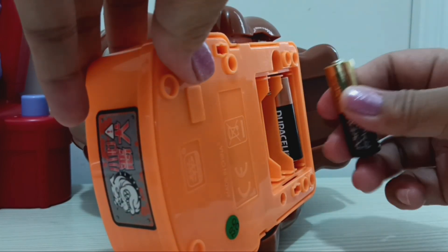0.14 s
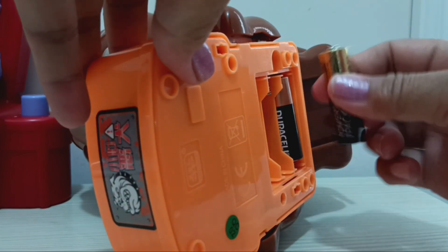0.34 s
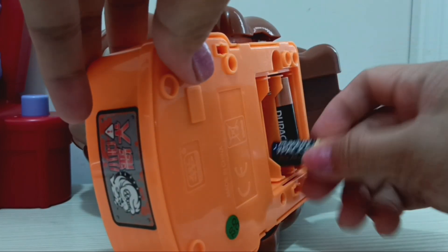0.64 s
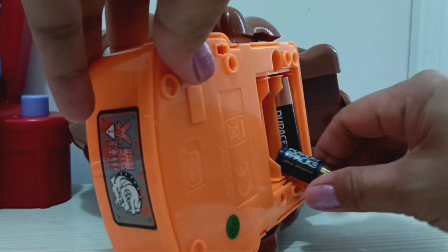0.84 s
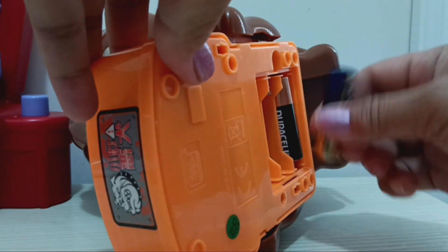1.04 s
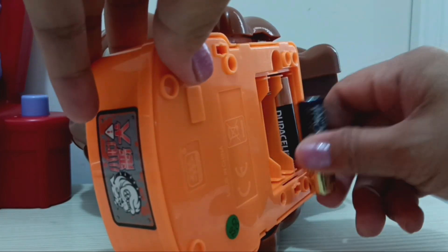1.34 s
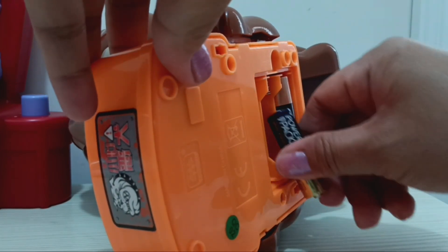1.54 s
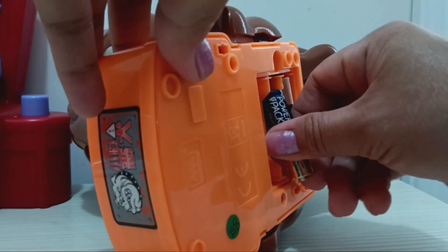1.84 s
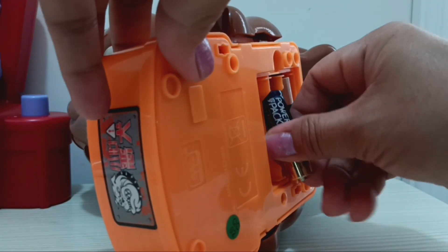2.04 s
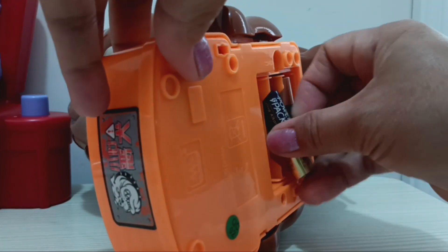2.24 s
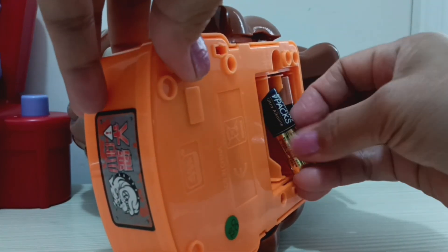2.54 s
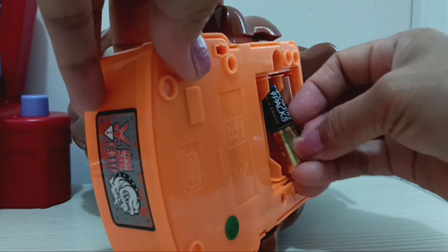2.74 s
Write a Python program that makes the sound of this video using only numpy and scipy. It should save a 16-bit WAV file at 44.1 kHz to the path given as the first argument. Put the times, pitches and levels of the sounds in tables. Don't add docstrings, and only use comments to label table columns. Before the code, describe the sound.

A small battery clicks and knocks into a hollow plastic toy, snapping home at two seconds

```python
import sys
import numpy as np
from scipy import signal
from scipy.fft import rfft, irfft, next_fast_len
from scipy.io import wavfile

SR = 44100
rng = np.random.default_rng(int(sys.argv[2]) if len(sys.argv) > 2 else 0)


def elevation(decibels):
    levels = np.asarray(decibels, float)
    return 10 ** (levels / 20)


def pcm_store(signal):
    levels = np.round(np.clip(np.atleast_2d(signal), -1, 1) * 32767)
    wavfile.write(sys.argv[1], SR, levels.astype(np.int16).T)


N = 127890
SPAN = 4096
SHELL_LIKENESS = 0.97

# (frequency [Hz], level [dB])
TOY_BALANCE = [(60, -9), (250, 12), (900, 11.5), (2100, 12), (4000, -3), (8500, -5.5), (10500, -29),
               (13000, -57)]
ROOM_BALANCE = [(60, 4.5), (250, 6), (1300, 5.5), (8000, -1), (11500, -31.5), (15000, -59)]


def rms_one(x):
    return x / np.sqrt(np.mean(x ** 2) + 1e-20)


def at_hz(points, hz):
    table_hz, value = np.transpose(points)
    return np.interp(np.log(hz), np.log(table_hz), value)


def drift(rate_hz):
    r = np.exp(-80 * np.pi * rate_hz / SR)
    slow = signal.lfilter([1], [1, -2 * r, r * r], rng.standard_normal(N // 40 + 2002))[2000:]
    return np.interp(np.arange(N) / 40, np.arange(len(slow)), rms_one(slow - slow.mean()))


def ring(push, hz, t60_s):
    r, w = elevation(-60 / (t60_s * SR)), 2 * np.pi * hz / SR
    return signal.lfilter([0, np.sin(w)], [1, -2 * r * np.cos(w), r * r], push + 1e-18)


def peak(x, hz, width_hz):
    r = np.exp(-np.pi * width_hz / SR)
    zeros = np.array([1, 0, -1]) * (1 - r * r) / 2
    poles = [1, -2 * r * np.cos(2 * np.pi * hz / SR), r * r]
    return signal.lfilter(zeros, poles, x + 1e-18)


def band(x, low_hz, high_hz):
    return signal.sosfilt(signal.butter(2, [low_hz, high_hz], "band", fs=SR, output="sos"), x)


def pair(noise, likeness):
    c = np.clip(likeness, 0, 1)
    common = np.sqrt((1 + c) / 2) * noise[0]
    opposed = np.sqrt((1 - c) / 2) * noise[1]
    return common + opposed * [[1], [-1]]


def ports(x, balance):
    left_lag_s = 0.0009827
    size = next_fast_len(N + 4096)
    hz = np.arange(size // 2 + 1) * SR / size + 1e-3
    db = at_hz(balance, hz)
    left = elevation(np.minimum(db, db / 2)) * np.exp(-2j * np.pi * hz * left_lag_s)
    right = elevation(-np.maximum(db / 2, 0))
    return irfft(rfft(x, size) * np.array([left, right]), size)[:, :N]


def room(x):
    t60_s, wall_cut_hz = 0.22, 13000
    size = next_fast_len(N + SR // 2)
    delay = np.exp(-2j * np.pi * np.arange(size // 2 + 1) / size)
    turn = np.log(delay)
    dull = np.exp(-2 * np.pi * wall_cut_hz / SR)
    echoes = np.zeros((2, size // 2 + 1), complex)
    lags = (rng.uniform(0.004, 0.03, 16) * SR).astype(int)
    for k, lag in enumerate(lags):
        decay = elevation(-60 * lag / SR / t60_s)
        loop = decay * (1 - dull) / (1 - dull * delay) * np.exp(lag * turn)
        echoes[k % 2] += (-1) ** (k // 2) * loop / (1 - loop)
    return irfft(echoes * rfft(x.mean(axis=0), size), size)[:, :N]


def hum():
    # (time [s], level [dB])
    tone_swell = [(0, -56.5), (.38, -63), (.47, -70.5), (.58, -61), (.76, -63.5), (0.901, -47.5),
                  (1.0, -67.5), (1.17, -59.5), (1.27, -49.5), (1.388, -52), (1.46, -65.5), (1.7, -56.5),
                  (1.881, -55.5), (1.97, -73), (2.15, -55.5), (2.33, -52.5), (2.421, -64.5), (2.9, -60.5)]
    # (time [s], level [dB])
    whine_swell = [(0, -12), (.9, -10), (1.05, 0), (1.38, 0), (1.5, -9), (2.7, -8), (2.85, 0)]
    tone_hz, wander_hz, flicker_db = 101.6, 0.98, 5
    drone_hz, drone_width_hz, drone_db = 269.5, 27.2, -63.5
    whine_hz, whine_width_hz, whine_db = 4460, 50, -76
    t = np.arange(N) / SR
    tone_db = np.interp(t, *np.transpose(tone_swell)) + flicker_db * drift(10.5)
    phase = 2 * np.pi * np.cumsum(tone_hz + wander_hz * drift(9.5)) / SR
    tone = np.sqrt(2) * elevation(tone_db) * np.sin(phase)
    white = rng.standard_normal((2, N))
    drone = peak(peak(white[0], drone_hz, drone_width_hz), drone_hz, drone_width_hz)
    whine = peak(peak(white[1], whine_hz, whine_width_hz), whine_hz, whine_width_hz)
    whine_db = whine_db + np.interp(t, *np.transpose(whine_swell))
    return tone + elevation(drone_db) * rms_one(drone) + elevation(whine_db) * rms_one(whine)


def air():
    # (frequency [Hz], level [dB per Hz])
    colour = [(20, -20), (70, -13.5), (250, -15.5), (600, -24.5), (2000, -39), (7000, -38.5),
              (11000, -47.5), (15500, -62)]
    # (frequency [Hz], share common to both ports [0-1])
    likeness = [(50, 0.1), (100, 1), (250, 0.54), (800, 0.06), (2000, 0.024)]
    level_db, patchy_db = -62.5, 2.5
    hiss, together = 0, drift(1.5)
    edges_hz = 18 * 2 ** np.arange(0, 10.1, 0.5)
    white = rng.standard_normal((2, 2, N))
    for k, (low, high) in enumerate(zip(edges_hz, edges_hz[1:])):
        hz = np.sqrt(low * high)
        flicker_db = patchy_db * (0.45 * together + drift(42.0))
        noise = pair(band(white[k % 2], low, high), at_hz(likeness, hz))
        hiss = hiss + elevation(at_hz(colour, hz) + flicker_db) * noise
    hiss = elevation(level_db) * rms_one(hiss)
    hiss = hiss + elevation(10) * peak(hiss, 10040, 1040)
    return 0.39 * hiss + signal.sosfilt(signal.butter(6, 8540, fs=SR, output="sos"), hiss)


def body(modes, rows, column, likeness):
    slip_spread_db, strike_spread_db = 3.0, 3.0
    t = np.arange(1, SPAN + 1) / SR
    strike_db = strike_spread_db * rng.standard_normal((len(rows), len(modes)))
    shape = (len(rows), 2, SPAN)
    slips = elevation(slip_spread_db * rng.exponential(1, shape)) * rng.standard_normal(shape)
    pushes = []
    for row, noise in zip(rows, slips):
        chatter_s = np.clip(row[-1], 0.1, 30) / 1000
        envelope = (1 - np.exp(-t / chatter_s)) * np.exp(-t / chatter_s)
        pushes.append(pair(noise, likeness) * envelope)
    starts = np.array(pushes)[:, :, :SPAN // 2]
    out = 0
    for k, (hz, mode_db, t60_s) in enumerate(modes):
        train = np.zeros((2, N + SPAN))
        heights = np.abs(ring(starts, hz, t60_s)).max(axis=2).mean(axis=1)
        for row, own_db, push, height in zip(rows, strike_db[:, k], pushes, heights):
            first = int(row[0] * SR)
            train[:, first:first + SPAN] += elevation(row[column] + own_db) * push / height
        out = out + (-1) ** k * elevation(mode_db) * ring(train[:, :N], hz, t60_s)
    return out


def table_thuds():
    # (time [s], level [dB], chatter [ms])
    thuds = [(0.537, -26, 4.56), (0.557, -35, 13.3), (0.675, -45.5, 3.3), (0.777, -39, 10),
             (1.451, -56.5, 9.5), (1.568, -49, 69), (1.65, -48, 13), (1.746, -46, 11.6), (1.802, -68, 8.1),
             (1.856, -57, 30), (2.003, -54, 31), (2.112, -32.5, 17.5), (2.138, -34, 26), (2.278, -44, 18.6),
             (2.574, -44, 8.8), (2.723, -44.5, 11.3), (2.87, -52, 7.1)]
    # (frequency [Hz], level [dB], t60 [s])
    modes = [(160, -7, .07), (210, 0.0, .07), (270, -5, .07), (330, -6, .06), (450, -9, .04),
             (560, -9, .04)]
    return band(body(modes, thuds, 1, SHELL_LIKENESS), 185, 620)


def twangs():
    # (time [s], frequency [Hz], level [dB], t60 [s])
    flicks = [(0.16, 8460, -61, 0.065), (0.522, 5430, -31, 0.028), (0.79, 4660, -32, 0.061),
              (0.797, 5300, -33.5, 0.034), (0.984, 1407, -65, 0.11), (2.466, 1970, -65, 0.16),
              (2.489, 1927, -42, 0.09), (2.49, 3270, -46.5, 0.091), (2.49, 5350, -52, 0.081),
              (2.557, 2810, -35.5, 0.033), (2.556, 3375, -34, 0.039), (2.559, 4000, -43.5, 0.07),
              (2.555, 5300, -44, 0.069), (2.556, 9430, -27, .022), (2.556, 10000, -31, .018),
              (2.636, 1950, -33.5, 0.078), (2.634, 9650, -37, 0.017), (1.445, 596, -45, 0.097),
              (1.78, 580, -48, 0.12), (1.89, 613, -50, 0.16), (2.29, 518, -43.5, .12),
              (1.445, 6340, -50, .02), (1.75, 7080, -54, 0.026), (1.751, 10230, -61, 0.016),
              (1.867, 2500, -50, .03), (1.868, 6020, -43, 0.061), (1.97, 7500, -52, 0.038)]
    rise_cycles, wobble = 1.3, 0.39
    out, t = np.zeros(N + 2 * SPAN), np.arange(2 * SPAN) / SR
    waver = 1 + wobble * drift(70.0)
    for time_s, hz, db, t60_s in flicks:
        first = int(time_s * SR)
        swell = 1 - np.exp(-t * hz / rise_cycles)
        out[first:first + 2 * SPAN] += elevation(db - 60 * t / t60_s) * swell * np.sin(2 * np.pi * hz * t)
    return out[:N] * waver


def battery_contacts():
    # (time [s], hollow knock [dB], wall ring [dB], tab crack [dB], chatter [ms])
    snap_home = [
        (2.075, -60, -40, -62, 6.0),
        (2.090, -31, -35, -48, 5.0),
        (2.104, -38, -31, -43, 3.0),
        (2.1130, -10, -14, -25, .6),
        (2.119, -18, -23, -27, 2.0),
        (2.127, -17, -30, -34, 1.5),
        (2.1356, -0.5, -12, -21, .35),
        (2.146, -23, -31, -33, 3.0),
        (2.155, -31, -35, -35, 4.0),
        (2.165, -31, -39, -39, 8.0),
    ]
    snaps = [(0.242, -79, -89, -62.5, 0.41), (0.502, -36.5, -43.5, -50.5, 1.1),
             (0.522, -27, -36.5, -31.5, 1.21), (0.541, -15.5, -42, -31, 1.4),
             (0.548, -29, -35.5, -34, 0.39), (0.554, -23, -29.5, -37.5, 2.1),
             (0.668, -41, -35.5, -59, 0.67), (0.672, -34, -37, -61, 2.4), (0.77, -33, -33, -53, 0.35),
             (0.773, -22.5, -37, -54.5, 0.62), (0.79, -35, -31.5, -53.5, 3.8),
             (0.795, -31, -24, -40.5, 1.25), (0.843, -50, -83, -52, 0.66), (1.445, -35, -36, -54, 1.76),
             (1.748, -47.5, -45, -56.5, 4.9), (1.869, -68, -35, -42, 1.66), (2.002, -57, -41, -61, 2),
             (2.386, -40.5, -43.5, -62, 4), (2.558, -93, -77, -43.5, 1.7), (2.634, -42, -34.5, -44.5, 2.5),
             (2.643, -28, -23, -41, 0.67), (2.648, -20, -20.5, -33, 0.68), (2.72, -32.5, -44, -64, 2.5),
             (2.73, -26, -30.5, -43.5, 0.76)]
    scrapes = [(0.508, -34, -47, -44.5, 11), (0.531, -27.5, -42, -34, 4), (0.56, -34, -40.5, -37.5, 10.6),
               (0.678, -35, -43, -59.5, 9.3), (0.734, -54, -58, -65.5, 30), (0.754, -52, -48, -60, 8.9),
               (0.778, -39, -32.5, -56, 2.8), (0.802, -57, -68, -48, 6.2), (1.522, -68, -44.5, -71, 34),
               (1.554, -53.5, -49, -59, 22), (1.607, -45.5, -42, -59.5, 4.3), (1.874, -49, -57, -49, 8.3),
               (1.969, -57, -43.5, -66.5, 8.9), (2.019, -50.5, -41.5, -54, 14.4),
               (2.079, -46, -35.5, -68, 46), (2.273, -42.5, -40.5, -57.5, 24.4),
               (2.464, -62, -62.5, -68.5, 19), (2.489, -71, -41, -56.5, 4.6), (2.562, -38, -42, -48, 15.8),
               (2.704, -30.5, -46, -63, 21), (2.779, -52.5, -49.5, -69, 22), (2.861, -43.5, -44, -84, 6.5)]
    return snap_home + snaps + scrapes


def hollow_knock(contacts):
    # (frequency [Hz], level [dB], t60 [s])
    modes = [(600, -15, .03), (725, -10, .022), (830, -2, .026), (952, 0.0, .03), (1095, -9, .022),
             (1285, -8, .022), (1480, -16, .015)]
    return elevation(-6.5) * band(body(modes, contacts, 1, SHELL_LIKENESS), 500, 1500)


def wall_ring(contacts):
    # (frequency [Hz], level [dB], t60 [s])
    modes = [(1720, -7, .02), (1860, -3, .022), (1975, -1, .022), (2150, -7, .018), (2390, -9, .016),
             (2600, -13, .014), (2830, -11, .018)]
    return elevation(-3.0) * band(body(modes, contacts, 2, SHELL_LIKENESS), 1450, 3000)


def tab_crack(contacts):
    # (frequency [Hz], level [dB], t60 [s])
    modes = [(3740, -30, 0.0033), (3836, -0.5, 0.0042), (4480, -4, 0.02), (5290, 1.5, 0.0022),
             (6450, -1, 0.005), (7000, 2.5, 0.001), (8200, -2.5, 0.0039), (9680, 12, 0.0016),
             (9484, 13, 0.0029), (12060, -11.5, 0.0002), (13900, -17, 0.0011)]
    rattle_ms, tab_likeness = 1.2, 0.75
    rattles = [(*row[:-1], row[-1] + rattle_ms) for row in contacts]
    return elevation(1.5) * band(body(modes, rattles, 3, tab_likeness), 1200, 17000)


def scene():
    room_db = -21
    background = hum() + air()
    contacts = battery_contacts()
    toy = table_thuds() + twangs()
    toy = toy + hollow_knock(contacts) + wall_ring(contacts) + tab_crack(contacts)
    return ports(background, ROOM_BALANCE) + ports(toy + elevation(room_db) * room(toy), TOY_BALANCE)


def roll_off(x):
    return signal.sosfilt(signal.butter(12, 16280, fs=SR, output="sos"), x)


def record(dry):
    mix = signal.sosfilt(signal.cheby2(12, 70, 16200, fs=SR, output="sos"), dry)
    return roll_off(mix)


dry = scene()
out = record(dry)
pcm_store(out)
```